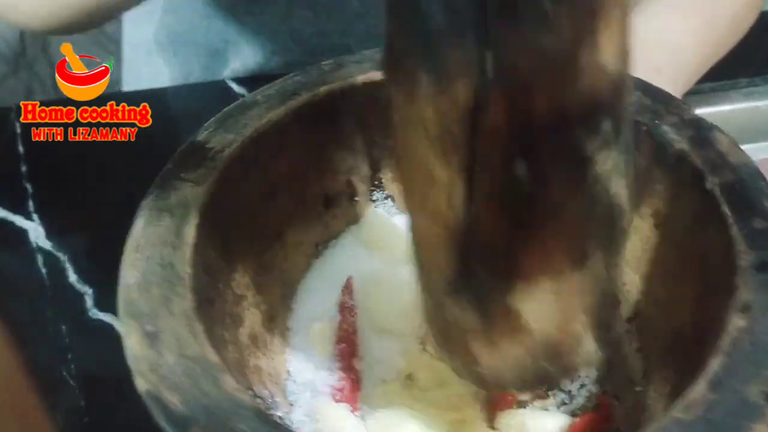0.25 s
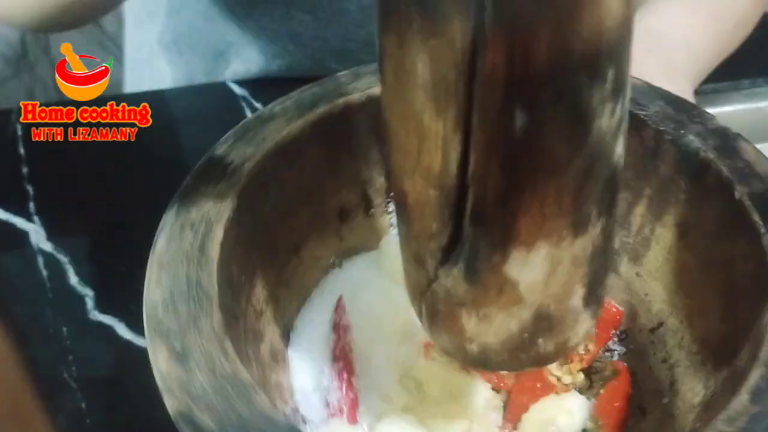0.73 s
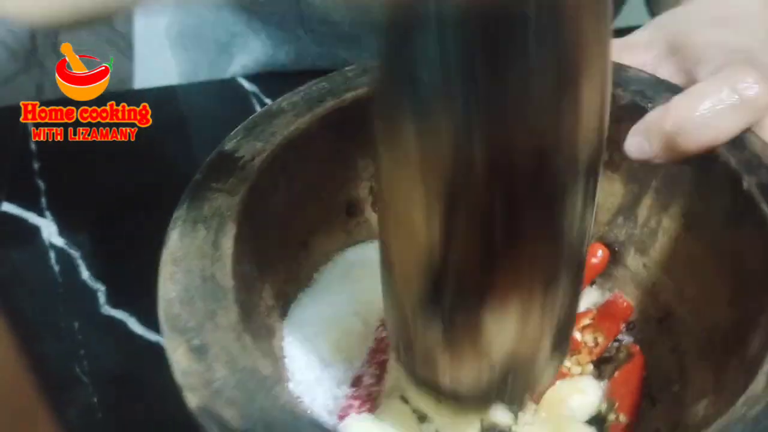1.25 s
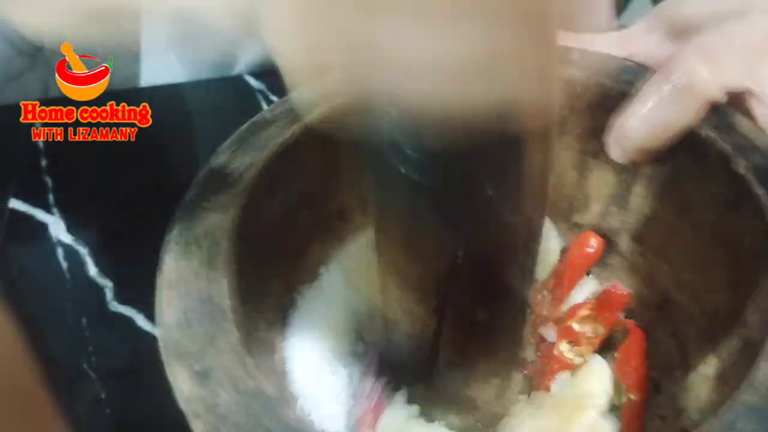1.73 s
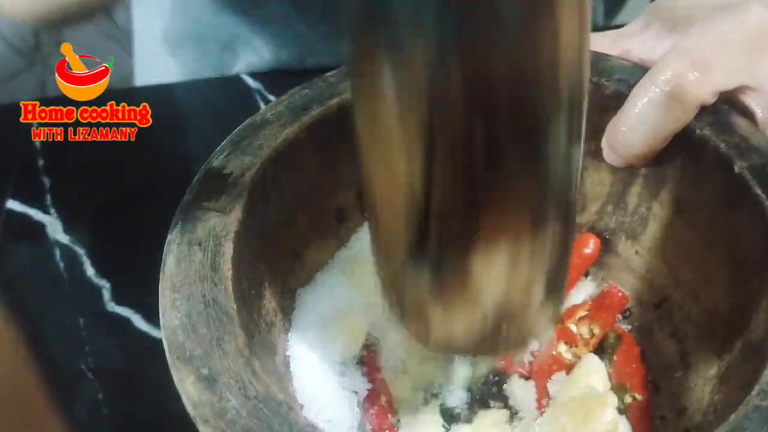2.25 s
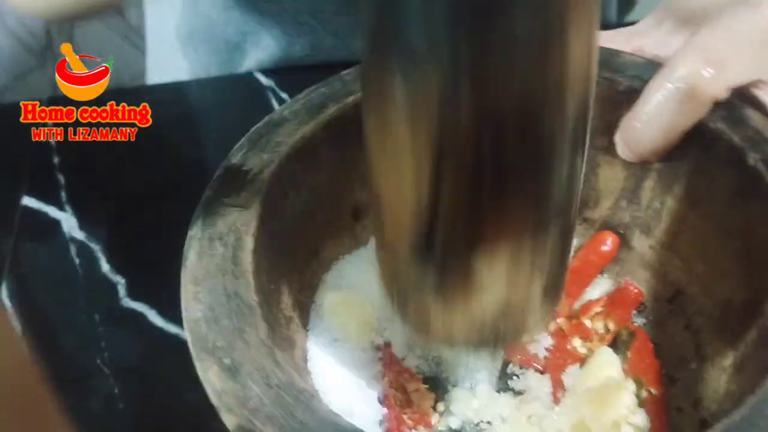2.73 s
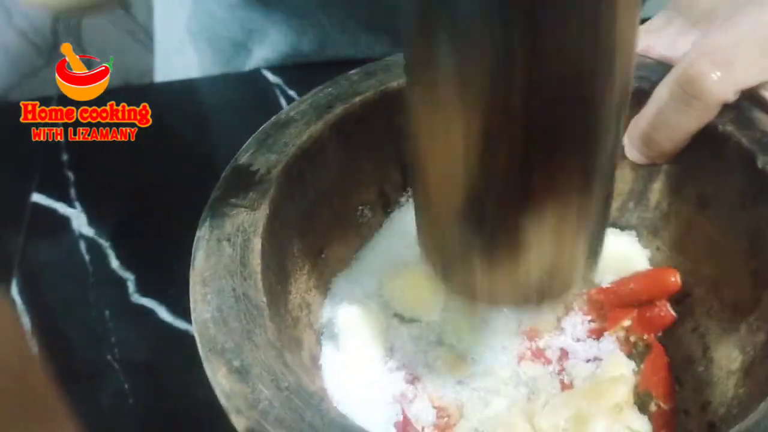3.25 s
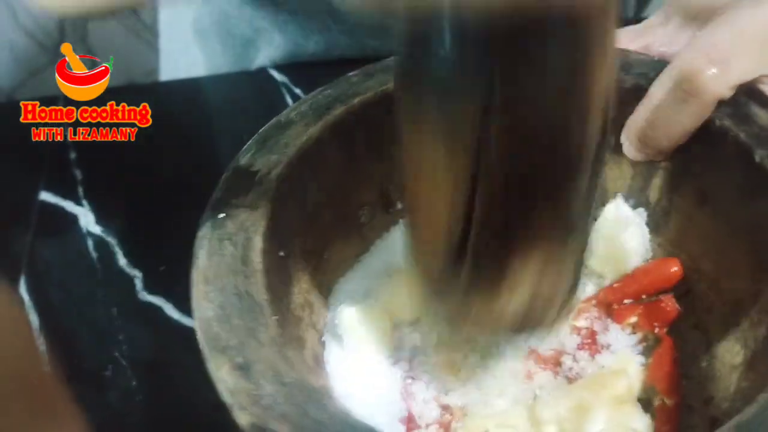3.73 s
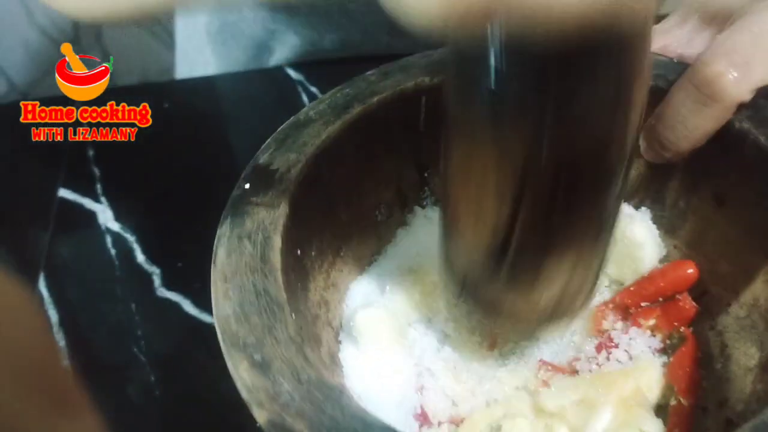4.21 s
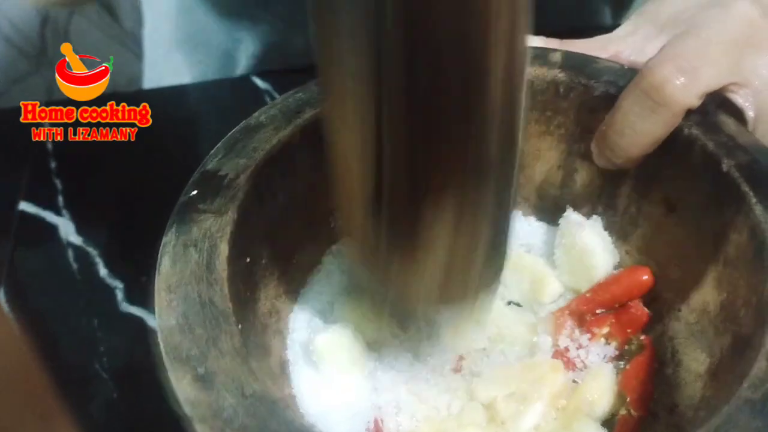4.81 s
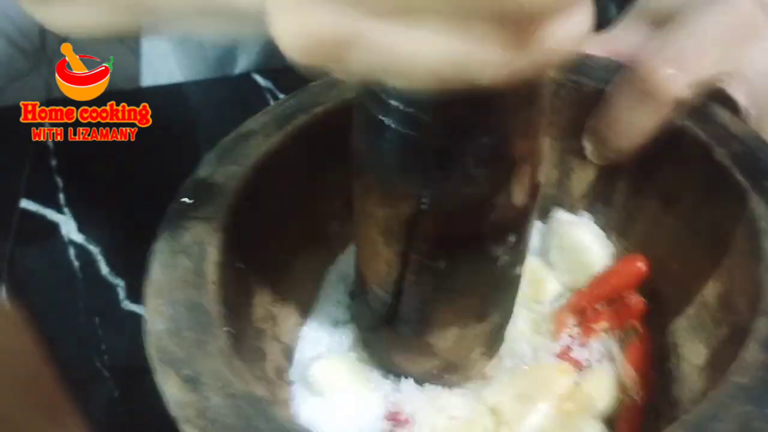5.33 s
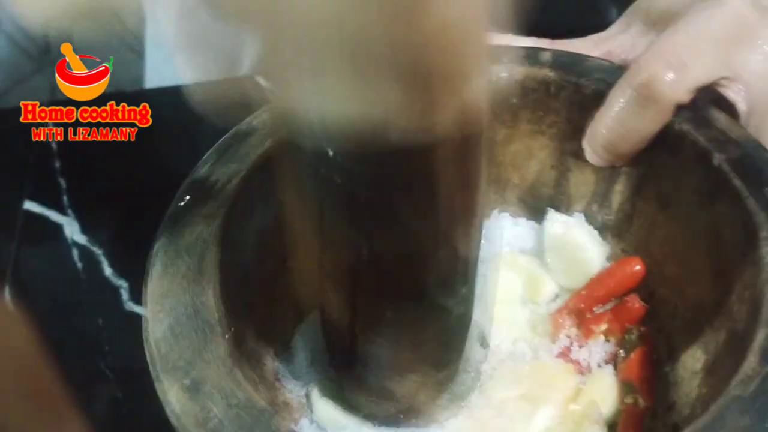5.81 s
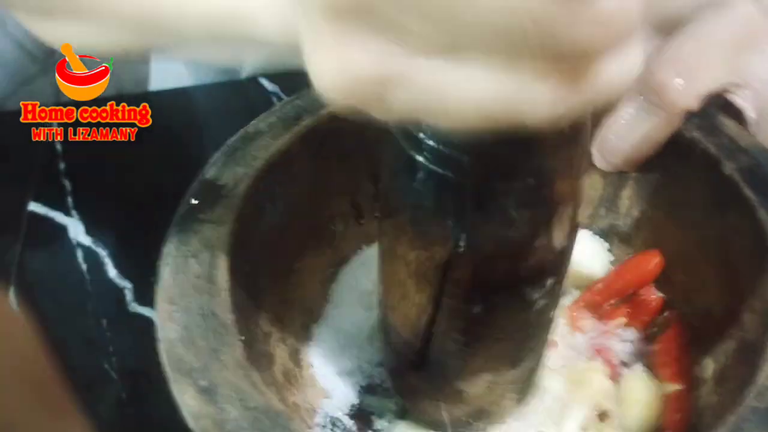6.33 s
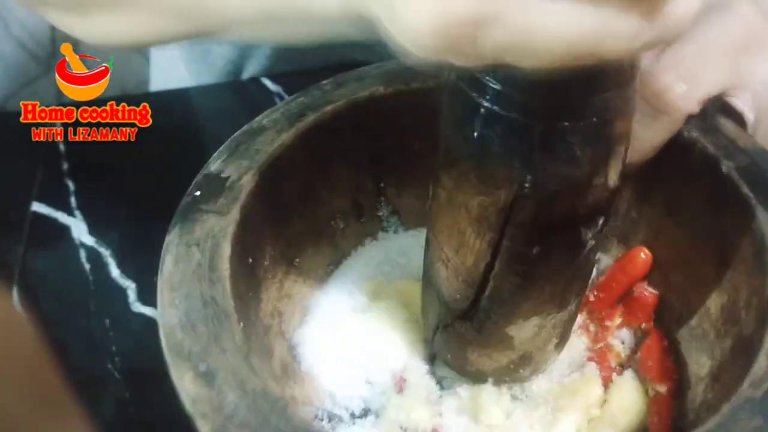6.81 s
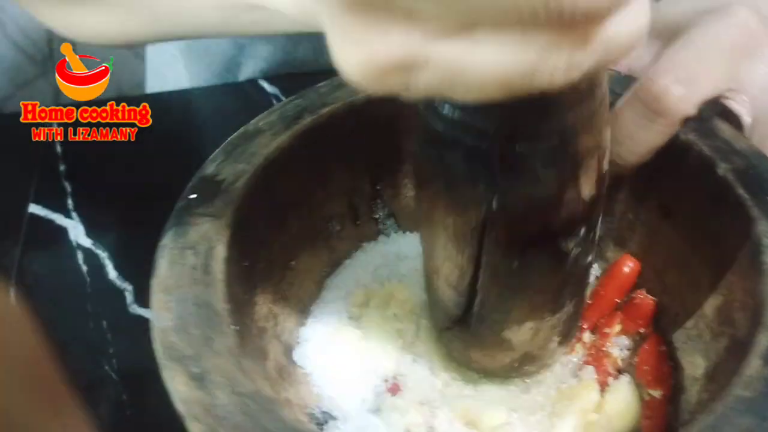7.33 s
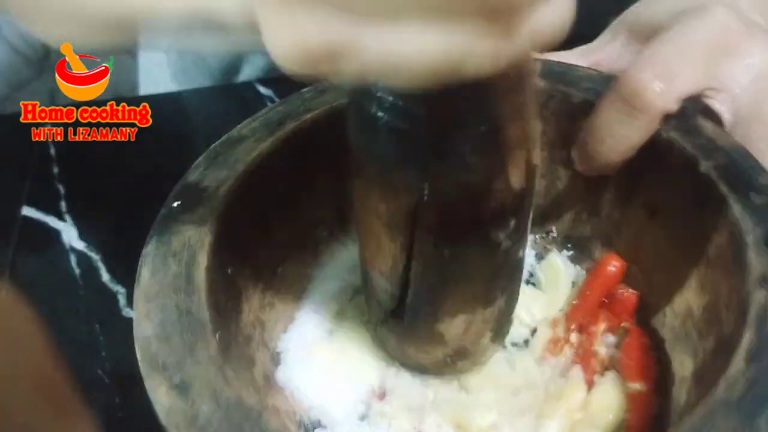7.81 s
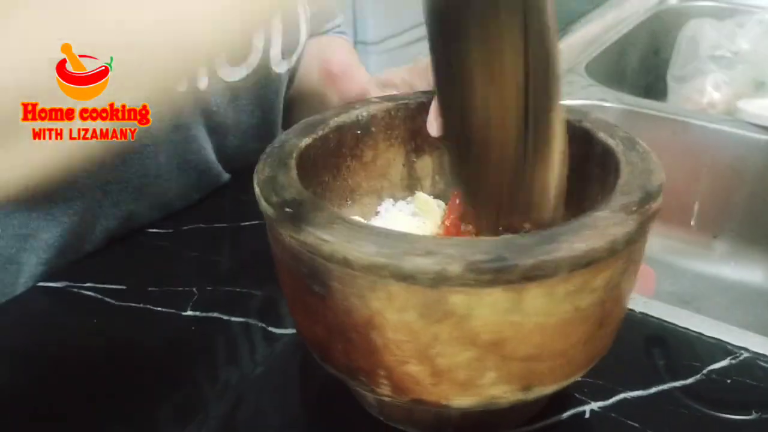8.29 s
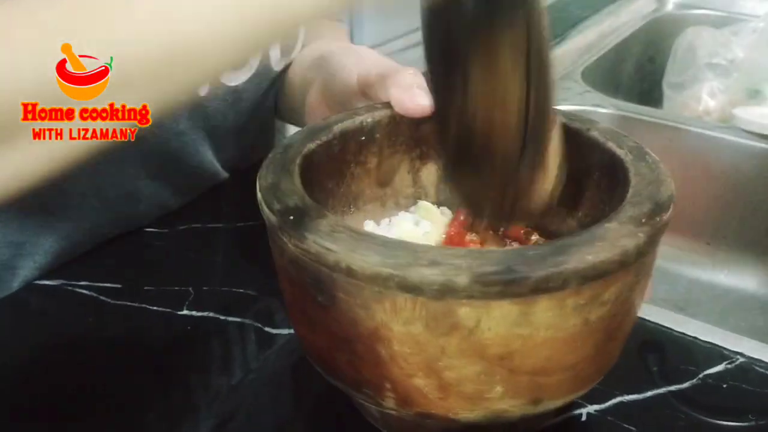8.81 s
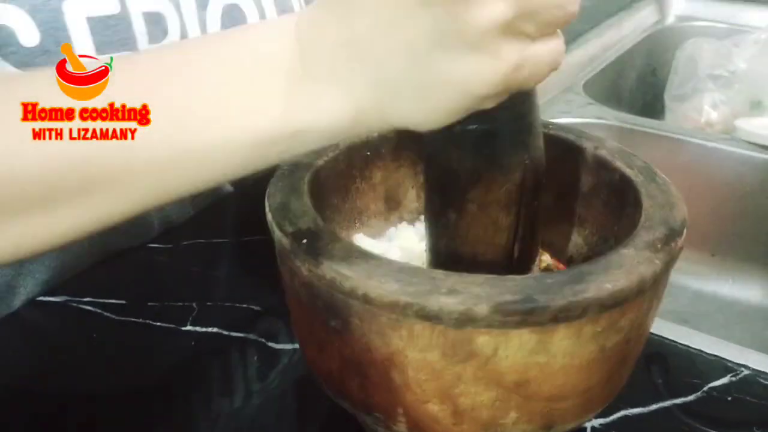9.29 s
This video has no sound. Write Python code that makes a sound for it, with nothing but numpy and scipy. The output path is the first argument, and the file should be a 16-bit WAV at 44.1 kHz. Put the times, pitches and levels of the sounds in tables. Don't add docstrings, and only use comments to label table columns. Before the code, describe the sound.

Rapid gritty crunches with woody knocks, about four a second, over kitchen hiss; a short total silence, then a few roomier blows from the side.

```python
import sys
import numpy as np
from scipy import signal
from scipy.fft import rfft, irfft
from scipy.io import wavfile
from scipy.ndimage import uniform_filter1d

SR = 44100
rng = np.random.default_rng(int(sys.argv[2]) if len(sys.argv) > 2 else 0)


def int16_out(signal):
    q = np.round(np.clip(np.atleast_2d(signal).T, -1, 1) * 32767)
    wavfile.write(sys.argv[1], SR, q.astype(np.int16))


def gain_from_db(level_db):
    decades = np.asarray(level_db, float) / 20
    return 10 ** decades


N = 421155
BREAK_START_S, BREAK_END_S = 7.8923, 8.3872
ECHO_PATTERNS = 5


def rms(x):
    return np.sqrt(np.mean(x ** 2) + 1e-20)


def at_hz(points, hz):
    table_hz, table_db = np.transpose(points)
    return np.interp(np.log(hz), np.log(table_hz), table_db)


def colour(points, size):
    hz = np.maximum(np.fft.rfftfreq(size, 1 / SR), 10)
    cepstrum = irfft(np.log(gain_from_db(at_hz(points, hz))))
    cepstrum[1:size // 2] *= 2
    cepstrum[size // 2 + 1:] = 0
    return irfft(np.exp(rfft(cepstrum)))


def add(track, s, sound):
    i = round(s * SR)
    track[i:i + len(sound)] += sound[:N - i]


def air():
    # f/Hz, level/dB per Hz
    from_above = [(90, -1), (450, -4), (1000, -4.5), (2300, 0.5), (4800, -16.5), (6400, -35.5),
                  (8800, -41.5), (12000, -30.5), (15700, -40.5), (15900, -56.5)]
    from_side = [(90, 0.5), (170, 1.5), (450, -10), (1100, -9.5), (3000, -13), (3800, -19), (4800, -22.5),
                 (6000, -28), (7700, -22), (9000, -27), (12000, -28), (15000, -23.5), (15700, -15.5),
                 (15900, -47)]
    # t/s, level/dB
    background = [
        (0, -45.5),
        (1.2, -49),
        (8.39, -49.5),
        (8.8, -43),
        (9.55, -42.5),
    ]
    # t/s, level/dB, spread/s
    jolts = [
        (0, -55, 0.45),
        (2.4, -66, 0.64),
        (3.4, -48, 0.14),
        (4.9, -60, 0.7),
        (6.1, -62, 0.52),
        (7.1, -59, 0.56),
        (8.85, -58, 0.1),
    ]
    rumble_floor_db = -71
    t = np.arange(N) / SR
    white = rng.standard_normal((2, N))
    above, side = (signal.fftconvolve(white[0], colour(p, size=8192))[:N] for p in (from_above, from_side))
    hiss = np.where(t < BREAK_END_S, above / rms(above), side / rms(side))
    hiss_gain = gain_from_db(np.interp(t, *np.transpose(background)))
    rumble = signal.sosfilt(signal.butter(2, [28, 70], "band", fs=SR, output="sos"), white[1])
    shaking = gain_from_db(rumble_floor_db)
    for s, db, spread_s in jolts:
        shaking = shaking + gain_from_db(db) * np.exp(-((t - s) / spread_s) ** 2)
    return hiss_gain * hiss + shaking * rumble / rms(rumble)


def preamp_offset():
    # t/s, offset/thousandths of full scale, settling time/s, steepness exponent
    starts = [
        (0, -36, .4, 1),
        (8.5, -31, .75, 2),
    ]
    t = np.arange(N) / SR
    return sum(size * np.exp(-(np.abs(t - s) / settle_s) ** steep) for s, size, settle_s, steep in starts) / 1000


def cut_db(t):
    # t/s, cut/dB
    hard_blows = [
        (0.021, 10),
        (.262, 1.5),
        (.506, 3),
        (.568, -0.5),
        (1.339, 3),
        (3.55, 4),
        (8.858, 3),
    ]
    hold_s, recover_db_per_s = 0.081, 304
    cuts = []
    for s, db in hard_blows:
        recovered = recover_db_per_s * np.maximum(t - s - hold_s, 0)
        cuts.append((t > s - .003) * (db - recovered))
    return np.maximum(np.max(cuts, axis=0), 0)


def gain_control():
    return gain_from_db(-uniform_filter1d(cut_db(np.arange(N) / SR), size=200))


def bowl_hollow(sound, hz, width_hz):
    r, w = np.exp(-np.pi * width_hz / SR), 2 * np.pi * hz / SR
    return signal.lfilter([(1 - r * r) / 2, 0, (r * r - 1) / 2], [1, -2 * r * np.cos(w), r * r], sound)


def crush(fall_ms, linger_db, linger_ms, grain_db, width_hz, fine_ms, push_db):
    # f/Hz, level/dB per Hz
    crunch_above = [(530, -15), (900, 1.5), (1310, -10), (1650, -3.5), (2140, -10.5), (2900, -5.5),
                    (3740, -10), (4600, -23), (6390, -24.5), (7500, -30.5), (8900, -49.5), (12200, -37),
                    (15700, -49), (15900, -60.5)]
    crunch_side = [(530, -25), (900, -1), (1410, -11), (2190, -7), (2440, -12.5), (2760, -8), (4490, -11),
                   (4830, -19), (7760, -3), (9310, -28.5), (15000, -17), (15700, -5.5), (15900, -32.5)]
    # t/s, peak level/dB, rise/ms, fine-salt level/dB re peak, bowl hollow f/Hz
    opening = [(.0218, -24.5, 2, -12, 2610), (.248, -22, 2.3, -19.5, 3300), (.2619, -13.5, 1.7, -16, 3260),
               (.4954, -22, 1.7, -16, 3300), (.5077, -22.5, 1.9, -15.5, 2750), (.5684, -25, 2.1, -15, 2400),
               (.7716, -19, 1.5, -16, 3180), (.783, -19, 2.6, -15.5, 3430), (.7877, -29, 3.6, -15.5, 3680),
               (1.33, -23, 3.1, -17, 3030), (1.3389, -15, 1.3, -20, 3340), (1.6923, -17, 4.2, -17, 3200),
               (1.699, -20.5, 1.1, -15.5, 2900), (1.7076, -17.5, 3.5, -15, 3000)]
    steady = [(2.0006, -21.5, 5.7, -10, 2850), (2.2813, -14, 5.1, -16, 3100),
              (2.5381, -10.5, 4.2, -17.5, 3280), (2.7872, -12, 3.5, -18.5, 2960),
              (3.0329, -16, 4.9, -20, 2920), (3.2975, -11, 3.4, -20.5, 2920),
              (3.5508, -9.5, 1.7, -24.5, 2900), (3.8084, -10, 2.8, -23, 2830),
              (4.0435, -10, 1.6, -24, 2640), (4.2906, -10, 5.7, -26, 2770), (4.526, -15, 5.4, -22.5, 2660),
              (4.7787, -12.5, 3, -24, 2960), (5.0312, -10.5, 3.9, -20.5, 2520),
              (5.282, -11.5, 1.05, -25.5, 3100), (5.5299, -11.5, 7.8, -21.5, 2930),
              (5.7626, -16.5, 2, -22.5, 2710), (6.01, -16, 3.1, -19.5, 2920), (6.2503, -13, 3, -22.5, 2650),
              (6.4905, -14.5, 7.2, -23, 2770), (6.735, -22, 1.1, -16, 2350),
              (6.9802, -11.5, 4.7, -18, 2700), (7.2386, -18, 2, -20.5, 2570),
              (7.5035, -11, 0.99, -21.5, 2000), (7.754, -11.5, 1.9, -20, 3050)]
    from_side = [
        (8.557, -26, 6.7, 3, 3060),
        (8.8569, -16.5, 1.3, -5, 2860),
        (8.8645, -35, 7.9, 2, 2340),
        (8.874, -31, 5.9, 1, 2190),
        (9.1547, -21.5, 2.2, -1.5, 3430),
        (9.1666, -25.5, 4, 0.5, 3010),
        (9.451, -17.5, 1.5, 1.5, 3290),
        (9.4582, -27, 3.3, 0.5, 3250),
        (9.4623, -19.5, 3.5, -6.5, 3200),
    ]
    # t/s, peak level/dB
    sinks = [(2.0063, -13), (2.287, -21), (2.7923, -13.5), (3.046, -14), (4.0535, -12.5), (4.5353, -15),
             (4.7897, -15), (5.0369, -15), (5.0455, -25), (5.3355, -31.5), (5.341, -33), (5.772, -14),
             (6.0165, -20), (6.7466, -13), (6.9925, -12), (7.2427, -17), (7.549, -32.5)]
    sink_rise_ms, sink_salt_db, sink_hz = 4.7, -23.5, 2900
    contacts = opening + steady + from_side + [(s, db, sink_rise_ms, sink_salt_db, sink_hz) for s, db in sinks]
    room_base_db, room_db_per_db, side_room_db = -41.5, 0.69, 4
    size, lead_s = 4096, .014
    peak = slice(565, 725)
    direct, feed = np.zeros(N), np.zeros((ECHO_PATTERNS, N))
    views = colour(crunch_above, size=1024), colour(crunch_side, size=1024)
    low, high = [signal.butter(6, 9400, kind, fs=SR, output="sos") for kind in ("low", "high")]
    rim = signal.butter(2, [4300, 5900], "band", fs=SR, output="sos")
    low_push = signal.butter(2, [35, 450], "band", fs=SR, output="sos")
    ms = np.arange(size) / SR * 1000 - 14
    after = np.maximum(ms, 0)
    snap = ms == after[after > 0][0]
    draws = rng.random((len(contacts), 3, size))
    for k, (s, db, rise_ms, treble_db, hz) in enumerate(contacts):
        side = s > BREAK_START_S
        room_db = room_base_db + room_db_per_db * (db + 16) + side_room_db * side + cut_db(s)
        big, sign, fine = draws[k]
        swell = np.where(ms < 0, np.exp(-(ms / rise_ms) ** 2), np.exp(-after / fall_ms))
        swell = swell + (ms > 0) * gain_from_db(linger_db) * np.exp(-after / linger_ms)
        grains = swell * gain_from_db(-grain_db * np.log(big + 0.003)) * np.sign(sign - .5)
        spray = (fine - .5) * np.where(ms < 0, swell, np.exp(-after / fine_ms))
        heard = signal.fftconvolve([grains, snap, spray], [views[side]], axes=1)[:, :size]
        rim_gain = gain_from_db(np.interp(s, (2.7, 3.5), (11.5, 2.3)))
        heard = heard + (rim_gain - 1) * signal.sosfilt(rim, heard)
        body = signal.sosfilt(low, 0.17 * heard + bowl_hollow(heard, hz, width_hz))
        treble = signal.sosfilt(high, heard[[2, 1]])
        near, far = (b / rms(b[peak]) + gain_from_db(treble_db) * h / rms(h[peak]) for b, h in zip(body, treble))
        add(direct, s - lead_s, gain_from_db(db - 7.5) * near)
        add(direct, s - lead_s, gain_from_db(db + push_db) * signal.sosfilt(low_push, swell))
        add(feed[k % ECHO_PATTERNS], s - lead_s, gain_from_db(room_db - 31) * far)
    return direct, feed


def modes(table, strengths_db, contact_ms):
    t = np.arange(4096) / SR
    out = 0
    for (hz, db, t60_s), own_db in zip(table, strengths_db):
        out = out + gain_from_db(db + own_db - 60 * t / t60_s) * np.sin(2 * np.pi * hz * t)
    contact = np.exp(-(t[:400] * 2000 / contact_ms - 2) ** 2)
    out = np.convolve(out, contact)[:len(t)]
    return out / np.abs(out).max()


def thud(spread_db):
    # f/Hz, level/dB, t60/s
    boom = [(177.1, -1, 0.061), (232, -2, 0.051), (268.6, 1, 0.046), (345, -3.5, 0.041), (434, -3.5, 0.041)]
    knock = [(605, -4, 0.019), (794, 7.5, 0.031), (886, -0.5, 0.045), (1044, -12.5, 0.066),
             (1400, -14.5, 0.028)]
    # f/Hz, level/dB per Hz
    far_above = [(300, -28), (440, -6), (600, -11), (780, -4), (850, -6), (900, 2), (960, -7), (1080, -11),
                 (1700, -16), (2600, -20), (5000, -34), (8000, -75)]
    far_side = [(250, -26), (440, -1), (600, -2), (790, 4), (1000, 0), (1400, -8.5), (2000, -10.5),
                (3000, -18.5), (4500, -31), (8000, -70)]
    # t/s, bowl boom/dB, pestle knock/dB, extra on bowl's deepest mode/dB, passed on to room/dB
    opening = [
        (.0229, -50, -11.5, -30, 16),
        (.2475, -31, -22.5, -12, -1),
        (.2627, -10, -23, -35, -3),
        (.5055, -22.5, -19.5, -36, 9.5),
        (.5672, -15.5, -16, -27.5, -3),
        (.785, -26, -38, 1, 1),
        (1.3399, -19, -11.5, -14.5, 3),
        (1.6925, -33.5, -27.5, -10.5, -0.8),
        (1.7113, -37.5, -26, -8.5, -2),
    ]
    steady = [(2.0092, -31, -29, 3.5, 0), (2.2873, -25, -24.5, 20, 0), (2.5353, -21.5, -21.5, 0, -0.9),
              (2.79, -19, -22.5, 1.5, -2), (3.047, -27, -27.5, 1.5, 0), (3.3006, -26.5, -17.5, 13, 2),
              (3.5495, -24, -27, -17, -1.2), (3.8094, -21.5, -23, -14, -2), (4.0437, -30, -27, 10, 2),
              (4.2956, -35.5, -16, -1, 1.2), (4.536, -27, -19, -4, 0), (4.787, -20, -19, 6, -0.5),
              (5.0285, -27, -27.5, -3, 2.5), (5.2836, -22, -20.5, -5, -1.5), (5.5282, -26, -22, -0.5, -0.5),
              (5.7718, -33, -28.5, 3, 2), (6.0154, -21.5, -26, 5, -3), (6.2531, -24, -24.5, 4, 0),
              (6.4892, -29, -24, 14, 2), (6.7331, -25.5, -26.5, 2.5, 2), (6.983, -28.5, -24, -1, 3),
              (7.2455, -29, -27, 5, 4.5), (7.5049, -22, -23, 1, 0.5), (7.753, -25, -31, 10.5, -1.5)]
    from_side = [
        (8.5616, -36, -36.5, -4, .3),
        (8.8585, -24, -14, -5.5, 10.1),
        (9.1621, -39.5, -31, -14, 8.7),
        (9.4576, -26, -32.5, 7.5, 1.8),
    ]
    blows = opening + steady + from_side
    boom_tail_db, knock_tail_db, knock_to_boom_db = -31, -9.5, -44
    harden_per_db = 0.22
    ring_on = 1.58
    ringing = [(hz, db, ring_on * t60_s) for hz, db, t60_s in boom]
    direct, feed = np.zeros(N), np.zeros((ECHO_PATTERNS, N))
    own_db = spread_db * rng.standard_normal((len(blows), 2, 5))
    far = colour(far_above, size=4096), colour(far_side, size=4096)
    for k, (s, boom_db, knock_db, deep_db, room_db) in enumerate(blows):
        bowl_db, pestle_db = own_db[k]
        bowl_db = bowl_db + deep_db * (np.arange(len(boom)) == 0)
        contact_ms = 1.05 * np.exp(-harden_per_db * (boom_db + 26))
        boom_far = np.hypot(gain_from_db(boom_db + boom_tail_db), gain_from_db(knock_db + knock_to_boom_db))
        add(direct, s, gain_from_db(boom_db + 7.0) * modes(boom, bowl_db, contact_ms))
        add(direct, s, gain_from_db(knock_db + 7.0) * modes(knock, pestle_db, contact_ms=0.06))
        echo = feed[k % ECHO_PATTERNS]
        add(echo, s, gain_from_db(room_db) * boom_far * modes(ringing, bowl_db, contact_ms=0.45))
        add(echo, s, gain_from_db(room_db + knock_db + knock_tail_db) * far[s > BREAK_START_S])
    far_cut = signal.butter(6, 142, "high", fs=SR, output="sos")
    near_cut = signal.butter(3, 140, "high", fs=SR, output="sos")
    return signal.sosfilt(near_cut, direct + 1e-18), signal.sosfilt(far_cut, feed + 1e-18)


def room_response():
    # f/Hz, t60/s
    room_t60 = [(100, 0.79), (300, 0.67), (800, 0.84), (2000, 1), (5000, 0.77), (12000, 0.53)]
    # f/Hz, level/dB
    tail_colour = [(100, -3), (400, 5), (900, 9), (1500, 2), (3000, 4.5), (5000, 10), (8000, 16),
                   (12000, 13.5), (16000, 10.5)]
    t = np.arange(SR) / SR
    edges_hz = 70 * 2 ** np.arange(0, 8.1, .5)
    white, out = rng.standard_normal((2, SR)), 0
    for k, (low, high) in enumerate(zip(edges_hz, edges_hz[1:])):
        band = signal.sosfilt(signal.butter(2, [low, high], "band", fs=SR, output="sos"), white[k % 2])
        hz = np.sqrt(low * high)
        out = out + band * gain_from_db(at_hz(tail_colour, hz) - 60 * t / at_hz(room_t60, hz))
    return out * (1 - np.exp(-t / 0.0013))


def scene():
    crunch, crunch_feed = crush(fall_ms=2.4, linger_db=-11, linger_ms=11.5, grain_db=6, width_hz=1040,
                                fine_ms=5.4, push_db=-20.5)
    knock, knock_feed = thud(spread_db=2.5)
    room = sum(signal.fftconvolve(feed, room_response())[:N] for feed in crunch_feed + knock_feed)
    mix = crunch + knock + gain_control() * (room + air() + preamp_offset())
    return mix[None]


def roll_off(x):
    return signal.sosfilt(signal.butter(12, 16810, fs=SR, output="sos"), x)


def record(dry):
    t = np.arange(N) / SR
    limited = 0.65 * np.tanh(dry / 0.67)
    x = signal.sosfilt(signal.cheby2(10, 50, 16550, fs=SR, output="sos"), limited)
    sounding = (t < BREAK_START_S) | (t > BREAK_END_S)
    return roll_off(x * sounding)


dry = scene()
out = record(dry)
int16_out(out)
```